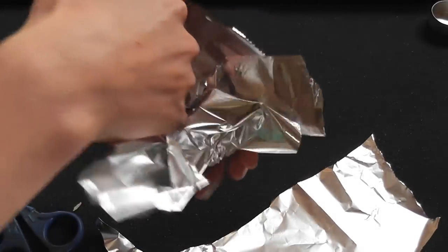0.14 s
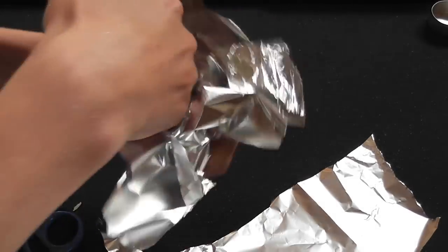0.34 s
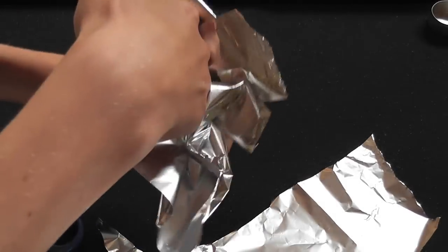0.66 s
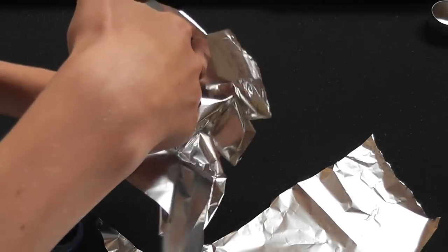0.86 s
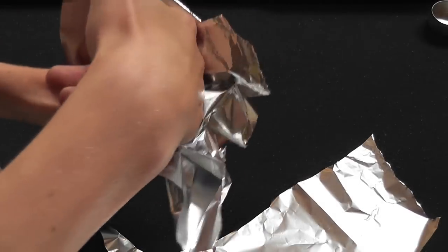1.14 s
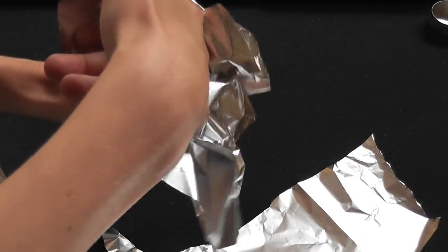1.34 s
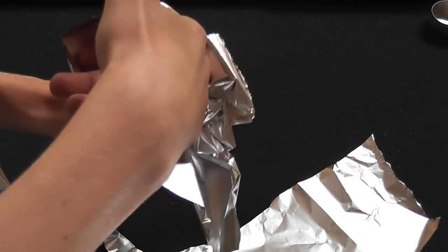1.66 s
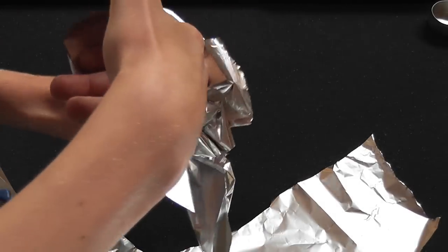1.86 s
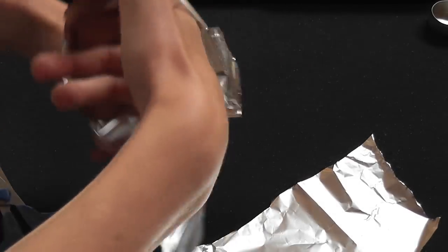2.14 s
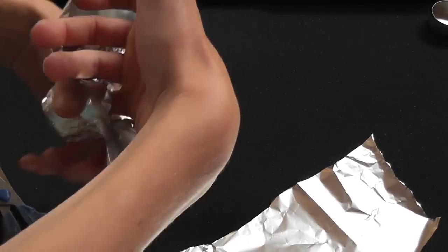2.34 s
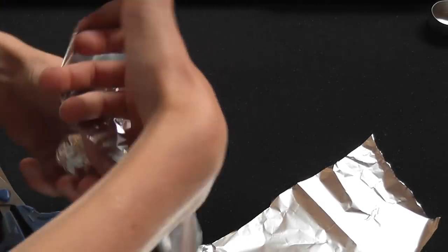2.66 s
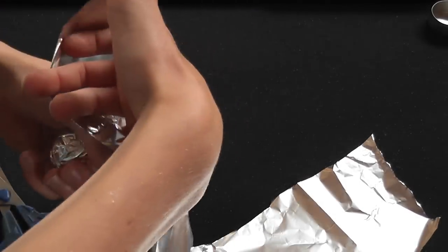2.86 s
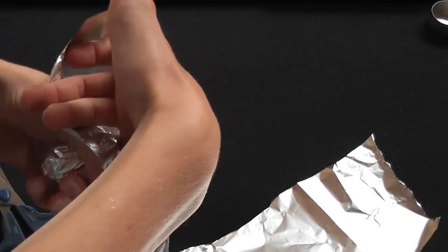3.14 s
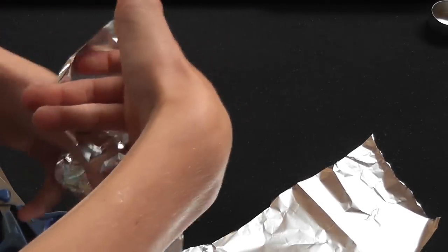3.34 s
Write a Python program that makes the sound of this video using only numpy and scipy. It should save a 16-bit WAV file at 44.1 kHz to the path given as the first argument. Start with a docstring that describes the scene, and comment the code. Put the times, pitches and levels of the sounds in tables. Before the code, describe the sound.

Crisp metallic foil crinkling, with bright snaps and ticks, handled close in a quiet small room

```python
"""Aluminium foil crackles as two hands wrap it around a ball, close above a table in a small room.
Each press sets off a dense crackle of tiny creases, made of noise bursts shaped by the foil's radiation.
Single creases tick and folds snap above it, small facets ping as gliding sines, and now and then a whole
panel pops through with a low puff of air. Two microphones hear it nearly central, with a short diffuse
tail from table and walls and a faint room tone of filtered noise."""
import sys
import numpy as np
from scipy import signal
from scipy.fft import rfft, irfft
from scipy.io import wavfile
from scipy.ndimage import uniform_filter1d

SR = 44100
rng = np.random.default_rng(int(sys.argv[2]) if len(sys.argv) > 2 else 0)


def wav_record(signal):
    """Record a signal, one row per channel, as 16-bit PCM in the file named by sys.argv[1]."""
    frames = np.transpose(np.atleast_2d(signal))
    bounded = np.clip(frames, -1, 1)
    # unit amplitude maps onto the largest positive 16-bit level
    quanta = np.round(bounded * 32767).astype(np.int16)
    wavfile.write(sys.argv[1], SR, quanta)


N = 154350
TIME = np.arange(N) / SR

# Room tone behind the foil: (frequency [Hz], relative density [dB per Hz])
ROOM_TONE_SPECTRUM = [(25, -7), (65, -38), (100, 4.5), (150, -14), (400, -20), (1500, -11), (15000, -54)]
# Panels that pop through, levels before the softening filters:
# (time [s], push level [dB], push lobe [s], sideways puff level [dB], puff lobe [s])
PANEL_POPS = [(0.2062, -38.5, 0.0021, -20, 0.0022), (0.496, -43, 0.0041, -22, 0.0022),
              (0.5481, -31.5, 0.0027, -14, 0.0013), (1.4170, -24, 0.0029, -29.5, 0.003),
              (1.558, -46, 0.0028, -27, 0.00085), (1.6342, -24, 0.0028, -28, 0.0023),
              (1.9431, -27, 0.0027, -18.5, 0.0018), (2.959, -29.5, 0.0017, -12.5, 0.0014),
              (3.058, -34.5, 0.0015, -48, .002), (3.2150, -47, 0.0032, -46, 0.0027)]
# Small taut facets that ping, before the foil's colour: (time [s], mid-glide pitch [Hz], peak level [dB])
FACET_PINGS = [(.618, 4170, -26), (0.679, 3250, -23.5), (0.738, 3680, -28), (1.682, 2470, -28.5),
               (1.712, 1250, -33.5), (1.824, 2860, -29), (1.839, 6700, -37), (2.063, 6500, -31),
               (2.583, 10900, -34), (2.9405, 4310, -27), (3.433, 990, -24.5)]
# Single small creases that tick out of the crackle: (time [s], level before TICK_TRIM_DB [dB])
CREASE_TICKS = [(0.07, -27), (0.1684, -22), (0.1775, -23), (0.2885, -25), (0.394, -28.5), (0.422, -31),
                (0.5082, -28), (0.5948, -26), (0.6316, -25.5), (0.639, -29), (0.6658, -23), (0.7174, -21),
                (0.7656, -24.5), (0.796, -26), (0.8158, -26), (0.8684, -39), (0.9611, -23.5), (0.9705, -30),
                (1.0047, -25), (1.0804, -24), (1.1422, -23.5), (1.2183, -25), (1.249, -26), (1.3402, -26),
                (1.4673, -29), (1.4993, -26.5), (1.5404, -28), (1.598, -27.5), (1.7885, -38.5),
                (1.8108, -42), (1.884, -30), (2.1148, -28), (2.1994, -26), (2.2086, -29), (2.3271, -23),
                (2.395, -28), (2.587, -34), (2.5999, -27.5), (2.6744, -23), (2.703, -27), (2.8184, -29),
                (2.8286, -27), (3.033, -31), (3.3278, -27)]
# Single folds that snap:
# (time [s], level before SNAP_TRIM_DB [dB], extra low mids [dB], extra top [dB], decay [s])
FOLD_SNAPS = [(0.0015, -22, 3, 3, 0.0042), (0.0603, -24.5, 18, 7, 0.0018), (0.0977, -17.5, -36, -6, 0.0056),
              (0.1378, -21, 6, 7, 0.0055), (0.2035, -17, -1, 4, 0.0034), (0.2105, -27.5, 17, 0, 0.0016),
              (0.2368, -20.5, -19, 0, 0.002), (0.2836, -27, 3, 11, 0.0011),
              (0.3328, -28.5, -1, -27, 0.0007), (0.409, -33, -2, -16, 0.0018),
              (0.4636, -21, 14.5, -4, 0.0007), (0.466, -28, -1, 6, 0.005), (0.495, -22.5, 10, 8, 0.0017),
              (0.5478, -23.5, 6, 7, 0.002), (0.555, -24.5, 1.5, -4, 0.0021), (0.6088, -22, -2, 1, 0.0023),
              (0.619, -31, -12, -23, 0.0013), (0.6477, -21.5, -3, 9, 0.0016),
              (0.7382, -24, -8, -13.5, 0.0011), (0.8003, -21, 3, 4.5, 0.003),
              (0.852, -27, -11, -12, 0.0018), (0.8828, -23, 1, 8, 0.0029), (0.884, -17, -8, -4.5, 0.0016),
              (0.9203, -26.5, 10, 6, 0.0028), (1.0743, -25, 13, -6.5, 0.0026),
              (1.0966, -18.5, -12, 6, 0.003), (1.1262, -25, -15, 9, 0.0012), (1.1951, -23, -8, -7, 0.0024),
              (1.228, -19.5, -6, -1, 0.0024), (1.254, -17, -25, -11, 0.0024), (1.3006, -30, 18, 3, 0.004),
              (1.3482, -22, -22, 7, 0.0015), (1.3639, -17.5, -3, -9, 0.0025), (1.3742, -21, 0, 0, 0.00077),
              (1.4166, -16.5, -12, 0, 0.00078), (1.4533, -23.5, -2, -9.5, 0.0012),
              (1.5302, -20.5, -7, -4, 0.0016), (1.5584, -18.5, -10, 0, 0.00043),
              (1.6244, -28.5, 20.5, 23, 0.001), (1.6332, -29, 6, 18, 0.0007),
              (1.654, -29.5, -6, -8, 0.0015), (1.6796, -30.5, -14, -3, 0.0039),
              (1.703, -33, -15, 0, 0.0015), (1.721, -23.5, -17, -4.5, 0.0025),
              (1.74, -29.5, -10, 0, 0.0011), (1.8654, -21, -4, 1, 0.0032), (1.8953, -22, -15, -19.5, 0.002),
              (1.924, -19, -7, -8, 0.003), (1.9425, -15, 9.5, 0, 0.0018), (2.016, -27.5, 9, 12, 0.0018),
              (2.0443, -30.5, -5, 12, 0.0042), (2.1027, -27, -3, 3, 0.0022),
              (2.1735, -23.5, 0.5, -3.5, 0.0028), (2.214, -21.5, -15, -1, 0.0036),
              (2.2616, -18.5, -1, -1, 0.0024), (2.3165, -24, -3, -4, 0.003), (2.365, -24.5, 10, -2, 0.003),
              (2.375, -23, 3, 12, 0.0045), (2.4408, -24, -3, 2, 0.0026), (2.4924, -22, 5, 5, 0.0021),
              (2.4992, -20, -16, -3, 0.0011), (2.517, -18.5, -4, -6.5, 0.01),
              (2.564, -22.5, -45, -11, 0.00075), (2.644, -25, 3, 9, 0.0028), (2.6828, -19.5, 0, -1, 0.0022),
              (2.7503, -29, 0, -9, 0.0043), (2.7747, -24, 3.5, 0, 0.0024), (2.796, -22.5, -1, 0, 0.0035),
              (2.8397, -22, -1, 2, 0.0036), (2.8573, -27.5, -17, 15, 0.0011),
              (2.8926, -20, -20, 3.5, 0.0017), (2.9396, -24, 2, -8, 0.0019), (2.959, -20, -1, 8, 0.0012),
              (3.0436, -27, -12, 8, 0.0009), (3.0585, -19, -16, -0.5, 0.00048),
              (3.074, -24.5, -10, -6, 0.0012), (3.123, -28, -6, 3, 0.0012), (3.1717, -24, -19, 0, 0.0012),
              (3.1769, -23, -6, -4, 0.002), (3.216, -23.5, 7, 5, 0.00079), (3.27, -24.5, 5, 9, 0.001),
              (3.402, -24, -7, -3.5, 0.005), (3.484, -27.5, -4, -6, 0.0021)]
# How hard the hands crush the foil: (time [s], crackle level before its trims [dB])
HAND_PRESS = [(0.0, -31.5), (0.024, -39.5), (0.048, -42.5), (0.054, -33.5), (0.093, -40), (0.132, -40),
              (0.144, -31), (0.275, -38), (0.287, -33), (0.311, -38), (0.338, -31), (0.356, -36.5),
              (0.419, -35.5), (0.473, -26.5), (0.509, -35), (0.554, -29), (0.599, -42.5), (0.7, -31),
              (0.796, -41), (0.802, -33.5), (0.835, -44.5), (0.886, -41), (0.913, -45), (0.928, -34.5),
              (0.946, -40), (1.012, -32), (1.045, -35.5), (1.06, -28.5), (1.107, -36), (1.182, -49),
              (1.251, -34), (1.284, -43.5), (1.305, -34.0), (1.395, -31), (1.452, -39), (1.518, -40.5),
              (1.533, -36), (1.622, -41.5), (1.634, -32), (1.643, -46.5), (1.679, -56), (1.685, -50),
              (1.739, -52), (1.757, -58.5), (1.808, -56.0), (1.856, -44.5), (1.871, -41), (1.916, -35.5),
              (1.94, -29.5), (1.993, -42.5), (2.02, -36), (2.032, -45), (2.056, -40.0), (2.101, -47),
              (2.11, -39.5), (2.2, -37.5), (2.218, -31.5), (2.305, -35.5), (2.323, -34.0), (2.338, -45.5),
              (2.389, -28.5), (2.404, -36.5), (2.439, -38), (2.469, -30.5), (2.538, -42.5), (2.697, -35.5),
              (2.718, -40.5), (2.751, -52), (2.757, -45), (2.823, -37), (2.867, -40), (2.891, -33.5),
              (2.903, -41), (2.948, -33), (2.987, -38.5), (3.005, -32.5), (3.143, -46.5), (3.17, -41),
              (3.197, -44), (3.218, -35), (3.227, -39), (3.29, -33), (3.388, -38.5), (3.403, -34),
              (3.424, -43), (3.445, -35), (3.499, -47)]
# Colour of the crackle as the grip moves: (time [s], low mids before their trim [dB], top [dB])
GRIP_COLOUR = [(0, -5, -2.5), (.03, -4.5, -7), (.1, -2, -7.5), (.22, -6.5, -4.5), (.33, -0.5, -6.5),
               (.41, -9.5, -4.5), (.47, -7, -5), (.62, -5.5, -1.5), (.97, -5.5, -6.5), (1.08, -6, 0),
               (1.16, -4, -13), (1.25, -4, -6), (1.6, -9, -5.5), (1.78, -2, -15.5), (1.93, -7.5, -2),
               (2.0, -4, -5), (2.24, -7, -5.5), (2.71, -5, -5), (3.03, -9, -4), (3.11, -4, -5.5),
               (3.29, -6, -2.5), (3.5, -2, -6.5)]
# What the foil radiates, with the notches of the table's reflection:
# (frequency [Hz], relative density [dB per Hz])
FOIL_SPECTRUM = [(40, -29), (120, -18.5), (250, -14.5), (450, -11), (720, -10.5), (900, -6.5), (1080, -5),
                 (1300, -7), (1600, -4.5), (1850, -6), (2100, -2), (2350, -3.5), (2550, -8.5), (2750, -3),
                 (3100, -1.5), (4150, 0), (5050, -3), (5750, 2), (7500, 2.5), (8500, 4), (9500, 2.5),
                 (11000, 5.5), (12500, 1.5), (14000, -0.5), (15800, -5.5)]
# Left-right difference of the foil against its middle: (frequency [Hz], level [dB])
STEREO_WIDTH = [(60, 0.5), (250, -1), (550, -13), (900, -12), (1800, -17), (3000, -33), (8300, -32),
                (10000, -19), (13000, -6.5), (16000, -4)]
# Left microphone's level over the right one: (frequency [Hz], level difference [dB])
LEFT_LEAN = [(300, -3), (700, 2.8), (1400, 1.2), (2600, 0), (9000, 0), (12000, 3.6), (13600, 4), (15000, 1)]
# Lag of the left microphone in the highest treble: (frequency [Hz], phase [rad])
LEFT_LAG = [(11800, 0), (14000, .7)]

ROOM_TONE_MIDDLE_DB, ROOM_TONE_SIDE_DB = -66.5, -65.5
ROOM_DB, ROOM_DECAY_S, ROOM_GAP_S = -16.5, 0.0075, 0.006
TAIL_CYCLES_PER_S = 1.475
POP_ONSET = 1.96  # the smaller, the more abruptly a panel flips
PING_DECAY_S = 0.0034
PING_SAG = 0.049  # a ping glides from this share above its pitch to the same share below
TICK_TRIM_DB, TICK_DECAY_S = -3.5, 0.0013
SNAP_TRIM_DB = -3
LEVEL_WINDOW_S = 0.0028  # a tick's or snap's energy is that of its level held this long
BRITTLE_S = 0.00075  # folds with a decay up to this get the full tick
CREASES_PER_S, CREASE_SPREAD_DB, CREASE_DECAY_S = 1400, 2, 0.00037
CRACKLE_TRIM_DB, LOW_MIDS_TRIM_DB = 2.5, 7
EVEN_OVER_S = 0.032  # span over which crease energy is evened out
FLICKERS_PER_S, FLICKER_DB = 110, 2.0
OPENING_SHARE = 0.27  # a fold opens with this share of its decay time
SHEET_DB, SHEET_DECAY_S = -12, 0.0067  # shiver of the rest of the sheet, against the burst's start
FACET_LOW_HZ, FACET_HIGH_HZ, FACET_DECAY_S, FACET_DB = 2803, 12560, 0.007, -11
LOW_MID_HZ, TOP_HZ = 2130, 6440  # where the three colour regions meet
CUTOFF_HZ = 15850
GRAIN = 2048  # length of one short sound [samples]


def from_db(db):
    """Decibels to gain."""
    return 10 ** (np.asarray(db) / 20)


def unit(x):
    """Scale to an energy of one."""
    return x / np.sqrt(np.sum(x ** 2) + 1e-20)


def in_time(rows):
    """Each column of a curve at every sample."""
    s, *columns = np.transpose(rows)
    return [np.interp(TIME, s, c) for c in columns]


def at_hz(points, hz):
    """Read a spectrum on a log-frequency axis."""
    at, value = np.transpose(points)
    return np.interp(np.log(hz + 1), np.log(at), value)


def bins(size):
    """Frequencies of a real FFT."""
    return np.arange(size // 2 + 1) * SR / size


def causal(db):
    """Minimum-phase impulse response with this gain per FFT bin."""
    cepstrum = irfft(np.log(from_db(db)))
    half = len(cepstrum) // 2
    cepstrum[1:half] *= 2
    cepstrum[half + 1:] = 0
    return irfft(np.exp(rfft(cepstrum)))


def through(x, response):
    """Filter every channel by one impulse response."""
    response = np.array(response, ndmin=x.ndim)
    return signal.fftconvolve(x, response, axes=-1)[..., :x.shape[-1]]


def regions(hz):
    """Smooth shares of low mids, middle and top at each frequency."""
    low = 1 / (1 + (hz / LOW_MID_HZ) ** 6)
    top = 1 - 1 / (1 + (hz / TOP_HZ) ** 6)
    return low, 1 - low - top, top


def add(out, s, sound):
    """Mix a sound in at a time."""
    i = int(s * SR)
    out[..., i:i + sound.shape[-1]] += sound[..., :N - i]


def room_tone():
    """Steady filtered noise of the room, drawn separately for middle and side."""
    response = unit(causal(at_hz(ROOM_TONE_SPECTRUM, bins(4 * GRAIN))))
    gains = from_db([[ROOM_TONE_MIDDLE_DB], [ROOM_TONE_SIDE_DB]])
    return gains * through(rng.standard_normal((2, N)), response)


def room(x, count=5):
    """A short diffuse tail from table and walls cycles steadily through several reflection patterns."""
    t = TIME[:SR // 3]
    envelope = np.exp(-t / ROOM_DECAY_S) * (t > ROOM_GAP_S)
    out = np.zeros(N)
    for k in range(count):
        turn = TIME * TAIL_CYCLES_PER_S + k / count
        share = np.clip(np.cos(2 * np.pi * turn), 0, 1)
        reflections = unit(rng.standard_normal(len(t)) * envelope)
        out += through(x * share, reflections)
    return from_db(ROOM_DB) * out / np.sqrt(count / 4)


def puff(lobe_s):
    """A panel flips over: one short lobe of pressure and a slower rebound; height one."""
    u = POP_ONSET * TIME[:GRAIN] / lobe_s
    wave = -u ** (POP_ONSET - 1) * (POP_ONSET - u) * np.exp(-u)
    return wave / np.abs(wave).max()


def filtered(x, order, edge_hz, kind="low"):
    """Butterworth filter."""
    return signal.sosfilt(signal.butter(order, edge_hz, kind, fs=SR, output="sos"), x)


def pops():
    """The push of a popping panel is common to both microphones; its sideways puff is opposite in them."""
    push, sideways = np.zeros(N), np.zeros(N)
    for s, push_db, push_s, puff_db, puff_s in PANEL_POPS:
        add(push, s, from_db(push_db) * puff(push_s))
        add(sideways, s, from_db(puff_db) * puff(puff_s))
    push = filtered(push, 2, 2700)
    sideways = filtered(sideways, 2, 1100)
    return push, 1.3 * filtered(sideways, 1, 90, "high")


def pings():
    """A taut facet flips and rings for a moment, its pitch sagging as it slackens; middle only."""
    out, t = np.zeros((2, N)), TIME[:GRAIN]
    fade = np.exp(-t / PING_DECAY_S)
    for s, hz, db in FACET_PINGS:
        pitch = hz * (1 + 2 * PING_SAG * (fade - 0.5))
        phase = 2 * np.pi * np.cumsum(pitch) / SR
        add(out[0], s, from_db(db) * np.sin(phase) * fade)
    return out


def crease(decay_s, patchy_db, tick, facet_db, low_db=0, top_db=0):
    """A crease gives way: tick, burst of bending waves, ringing facet, shivering sheet; middle and side."""
    t, hz = TIME[:GRAIN], bins(GRAIN)
    opening = 1 - np.exp(-(t + 1 / SR) / (OPENING_SHARE * decay_s))
    decay = np.exp(-t / decay_s) + from_db(SHEET_DB) * np.exp(-t / SHEET_DECAY_S)
    burst = rng.standard_normal((2, GRAIN)) * unit(opening * decay)
    burst[0, 0] += tick * rng.choice([-1, 1])
    facet_hz = FACET_LOW_HZ * (FACET_HIGH_HZ / FACET_LOW_HZ) ** rng.random()
    facet = np.sin(2 * np.pi * facet_hz * t) * np.exp(-t / FACET_DECAY_S)
    burst[0] += from_db(facet_db) * unit(facet)
    # every crease favours other patches of the spectrum, at the same mean power
    knots = np.linspace(0, np.sqrt(CUTOFF_HZ), 30)
    patches_db = patchy_db * np.interp(np.sqrt(hz), knots, rng.standard_normal(30))
    patches_db -= 10 * np.log10(np.mean(from_db(patches_db[hz < CUTOFF_HZ]) ** 2))
    low, _, top = regions(hz)
    colour_db = patches_db + low_db * low + top_db * (top - 0.5)
    return through(np.array([unit(b) for b in burst]), causal(colour_db))


def ticks():
    """Small creases give way alone between the folds: short, dry and each of another colour."""
    out = np.zeros((2, N))
    for s, db in CREASE_TICKS:
        tick = crease(TICK_DECAY_S, patchy_db=3.5, tick=0.69, facet_db=FACET_DB)
        add(out, s, from_db(db + TICK_TRIM_DB) * np.sqrt(LEVEL_WINDOW_S * SR) * tick)
    return out


def snaps():
    """Larger folds snap one at a time, each with its own colour and length."""
    out = np.zeros((2, N))
    for s, db, low_db, top_db, decay_s in FOLD_SNAPS:
        brittle = min(BRITTLE_S / decay_s, 1)
        snap = crease(decay_s, patchy_db=1.5, tick=brittle, facet_db=-13, low_db=low_db, top_db=top_db)
        add(out, s, from_db(db + SNAP_TRIM_DB) * np.sqrt(LEVEL_WINDOW_S * SR) * snap)
    return out


def colour_flicker():
    """Random level flicker, drawn anew for the crackle's low mids, middle and top."""
    steps = rng.standard_normal(GRAIN)
    return from_db(FLICKER_DB * np.interp(TIME * FLICKERS_PER_S, np.arange(GRAIN), steps))


def crackle(count=120):
    """Creases of uneven size give way at random all over the sheet, as loud as the hands press."""
    born = rng.random(N) < CREASES_PER_S / SR
    size_db = CREASE_SPREAD_DB * np.minimum(rng.exponential(1, N), 3.8)
    sizes = born * from_db(size_db) * rng.choice([-1, 1], N)
    energy = uniform_filter1d(sizes ** 2, int(EVEN_OVER_S * SR))
    energy = uniform_filter1d(energy, int(EVEN_OVER_S * SR / 2))
    sizes = sizes / np.sqrt(energy + 1e-4)
    dealt = rng.integers(0, count, N)
    kinds = [crease(CREASE_DECAY_S, patchy_db=5, tick=0.3, facet_db=FACET_DB) for _ in range(count)]
    out = np.zeros((2, N))
    for i in np.flatnonzero(born):
        add(out, i / SR, sizes[i] * kinds[dealt[i]])
    spectrum = rfft(out, 2 * N)
    shares = regions(bins(2 * N))
    low, middle, top = (irfft(spectrum * share)[:, :N] * colour_flicker() for share in shares)
    press_db, = in_time(HAND_PRESS)
    low_db, top_db = in_time(GRIP_COLOUR)
    coloured = low * from_db(low_db + LOW_MIDS_TRIM_DB) + middle + top * from_db(top_db)
    # half of the top's change is taken back from the whole
    return from_db(press_db + CRACKLE_TRIM_DB - top_db / 2) * coloured


def microphone(x, sign):
    """What reaches the left (+1) or right (-1) microphone: half of the lean and of the lag each."""
    hz = bins(2 * N)
    gain = from_db(sign * at_hz(LEFT_LEAN, hz) / 2)
    lag = np.exp(-1j * sign * at_hz(LEFT_LAG, hz) / 2)
    return irfft(rfft(x, 2 * N) * gain * lag)[:N]


def scene():
    """Foil close up in the room, nearly central, wider in the bass and the highest treble."""
    hz = bins(GRAIN)
    top_cut_db = 40 * np.clip((hz - CUTOFF_HZ) / 2000, 0, 1)
    colour = unit(causal(at_hz(FOIL_SPECTRUM, hz) - top_cut_db))
    foil = through(pings() + ticks() + snaps() + crackle(), colour)
    middle, side = (x + room(x) for x in foil)
    side = through(side, causal(at_hz(STEREO_WIDTH, hz)))
    push, sideways = pops()
    tone_middle, tone_side = room_tone()
    channels = []
    for sign in (1, -1):
        foil_heard = microphone(middle + sign * side, sign)
        channels.append(foil_heard + push + tone_middle + sign * (tone_side - sideways))
    return np.array(channels)


def record(dry):
    """The top is cut steeply by a linear-phase low-pass."""
    low_pass = signal.firwin(301, CUTOFF_HZ, fs=SR, window="blackman")
    return signal.fftconvolve(dry, low_pass[None], "same", axes=1)


dry = scene()
out = record(dry)
wav_record(out)
```